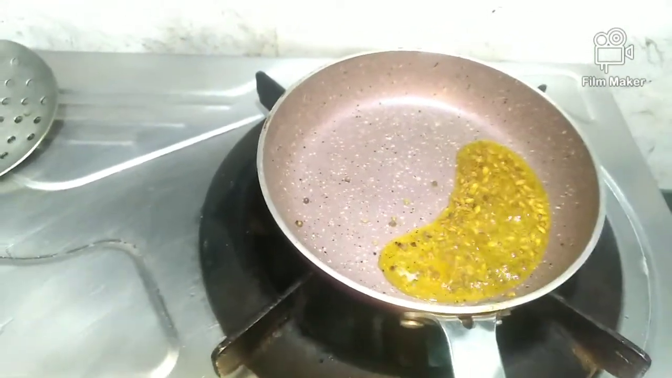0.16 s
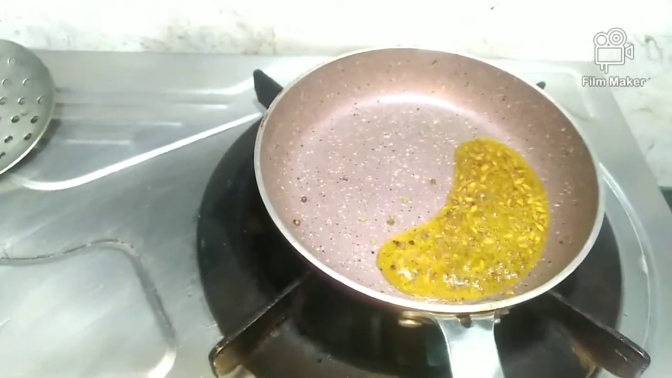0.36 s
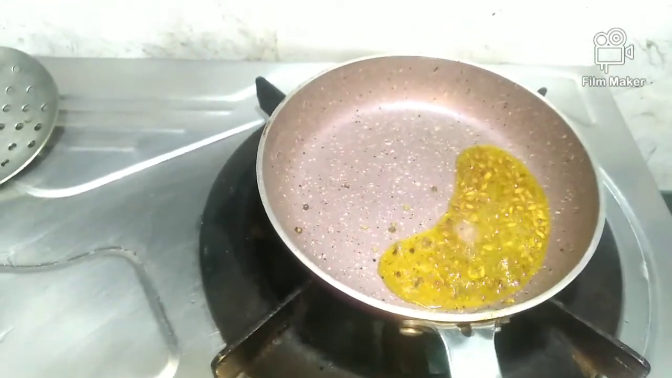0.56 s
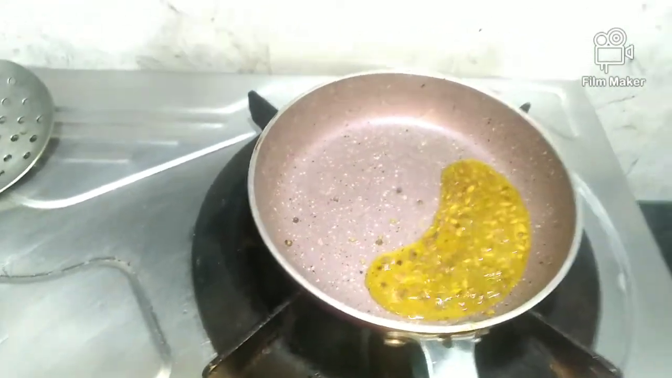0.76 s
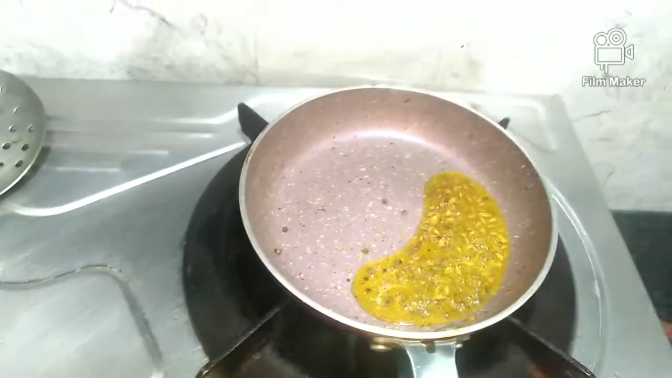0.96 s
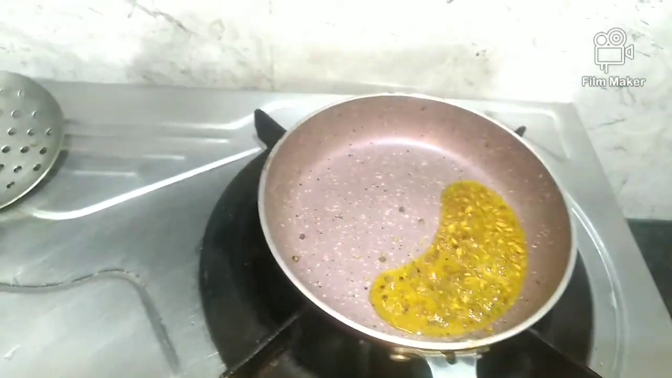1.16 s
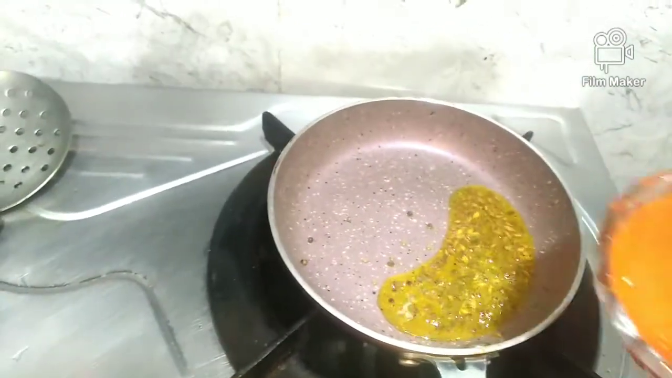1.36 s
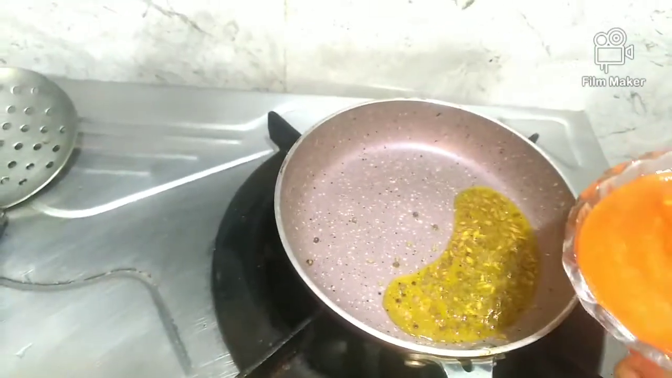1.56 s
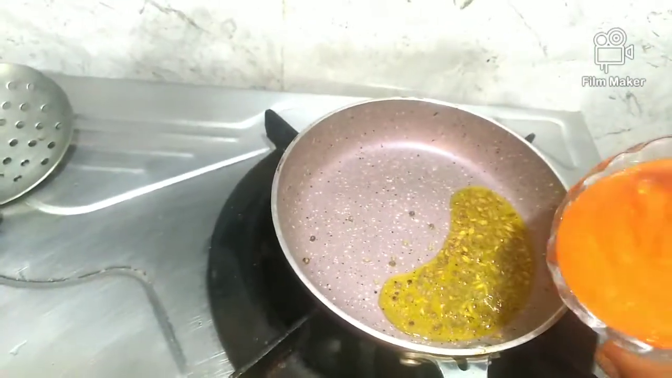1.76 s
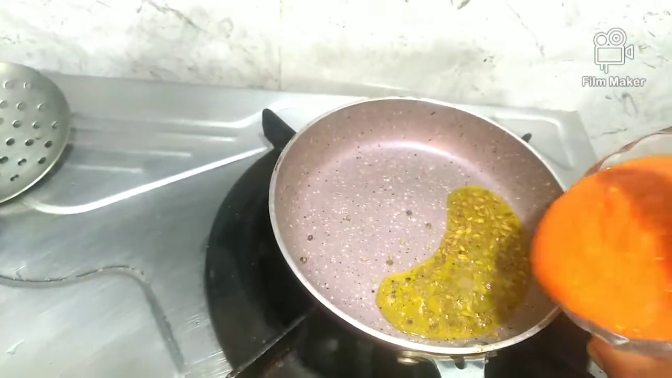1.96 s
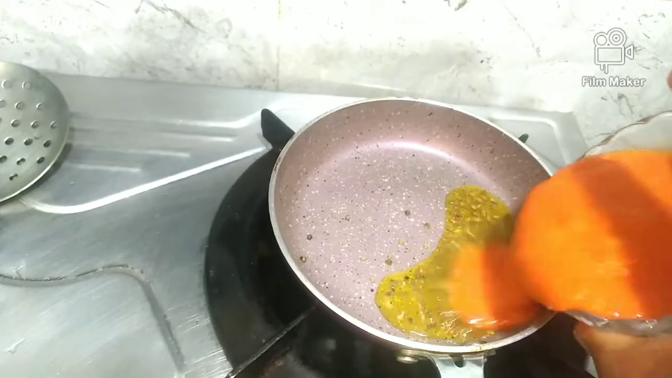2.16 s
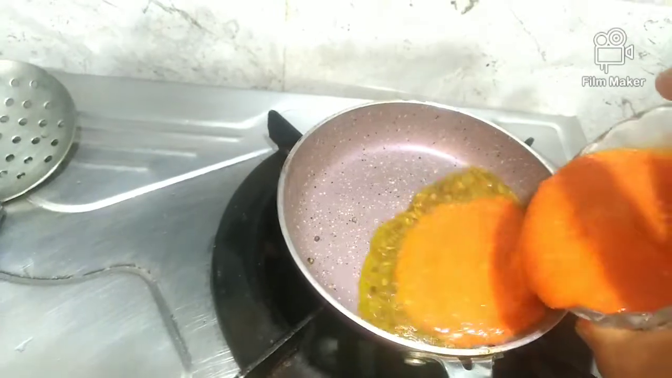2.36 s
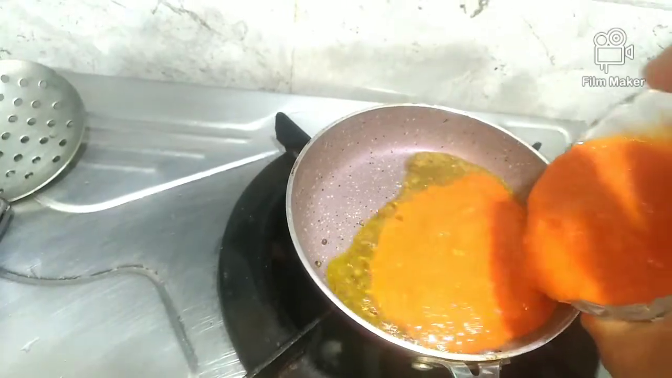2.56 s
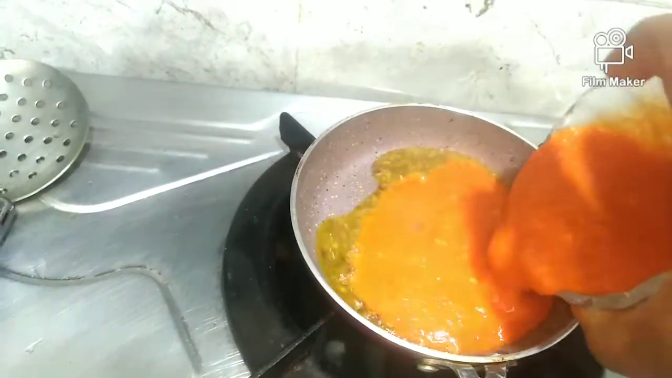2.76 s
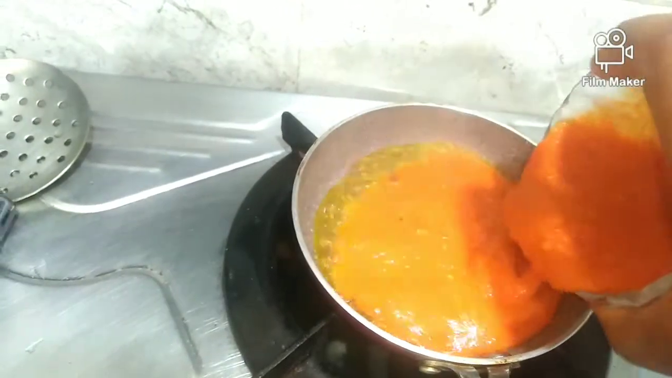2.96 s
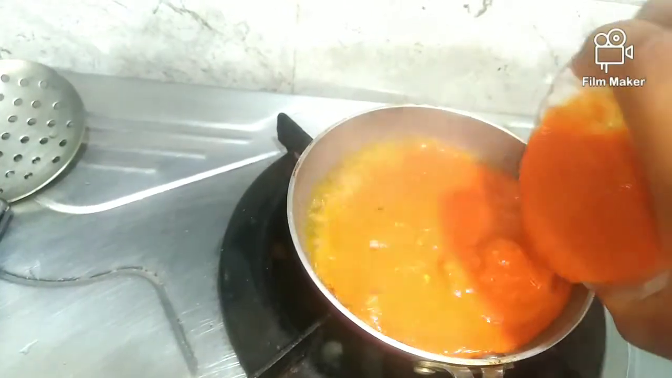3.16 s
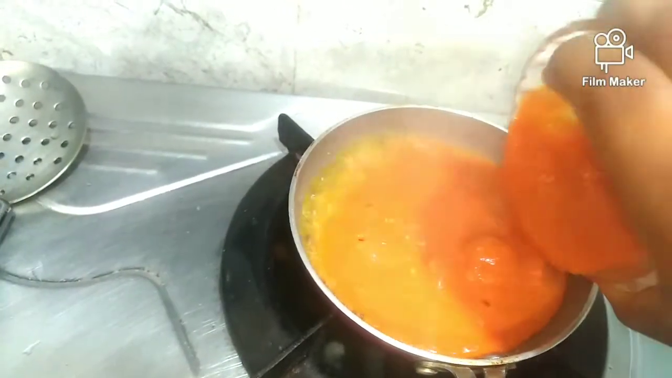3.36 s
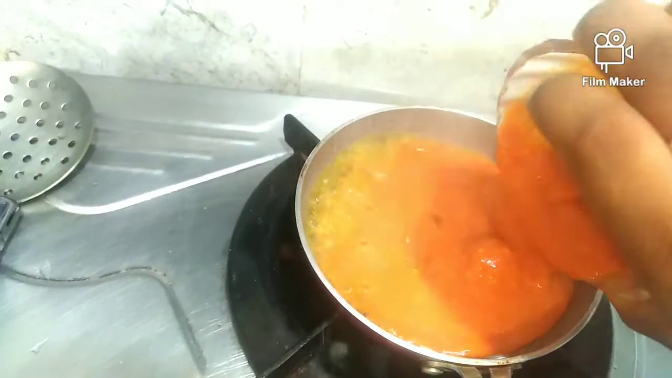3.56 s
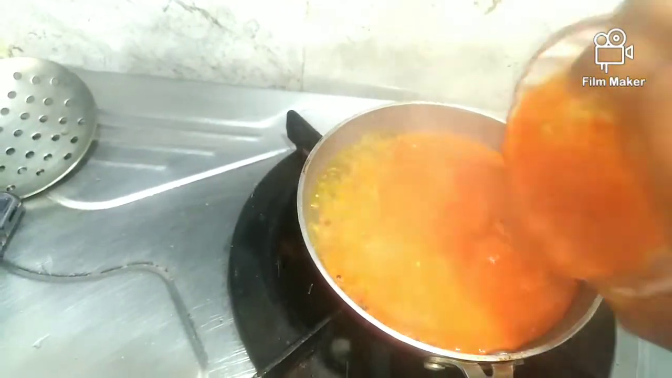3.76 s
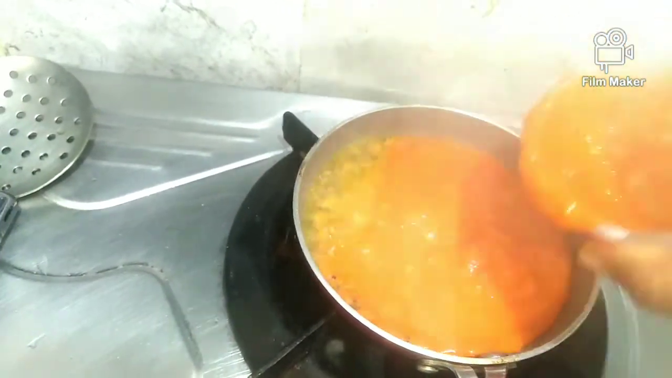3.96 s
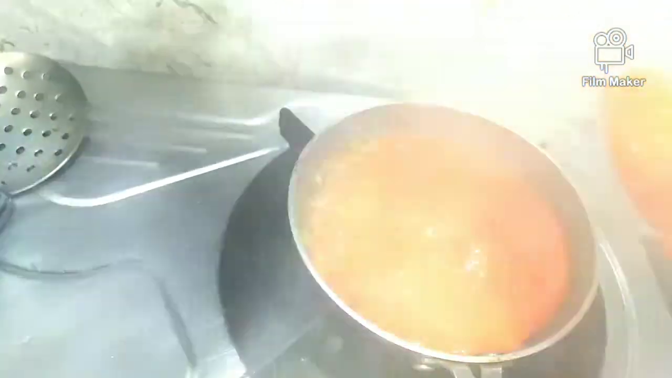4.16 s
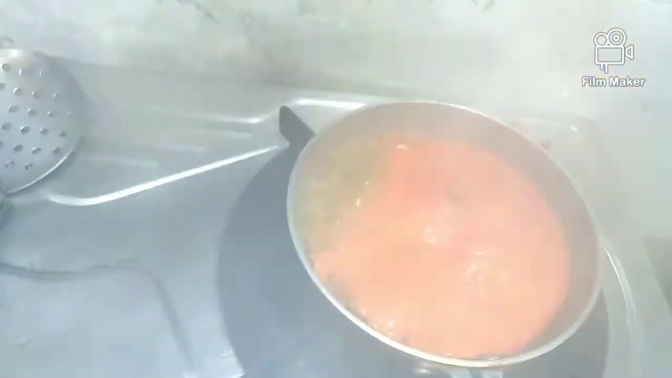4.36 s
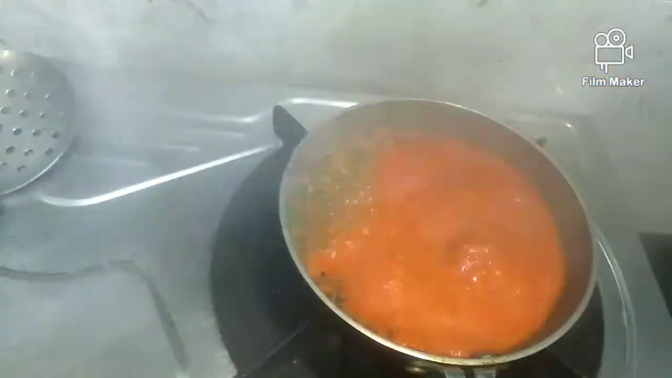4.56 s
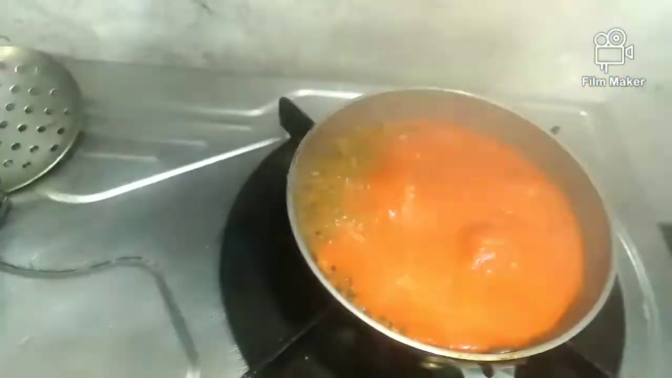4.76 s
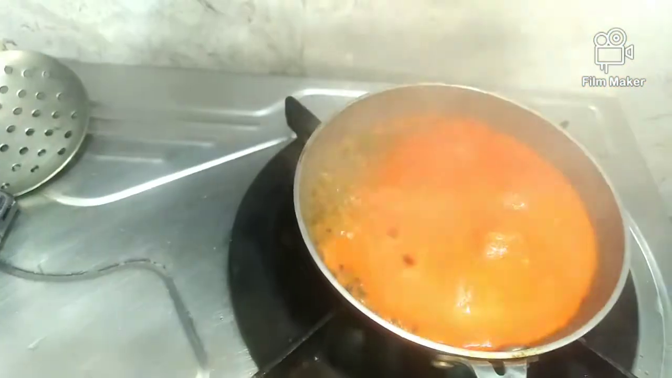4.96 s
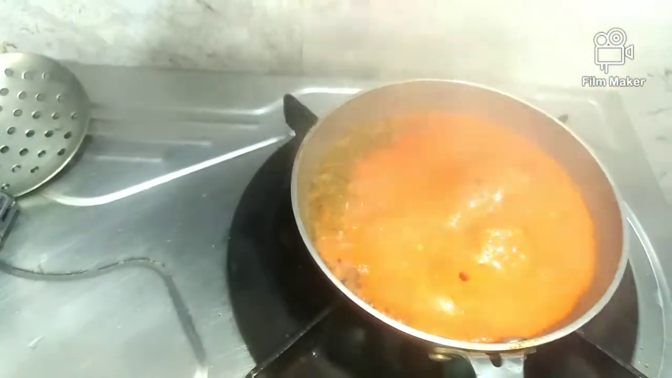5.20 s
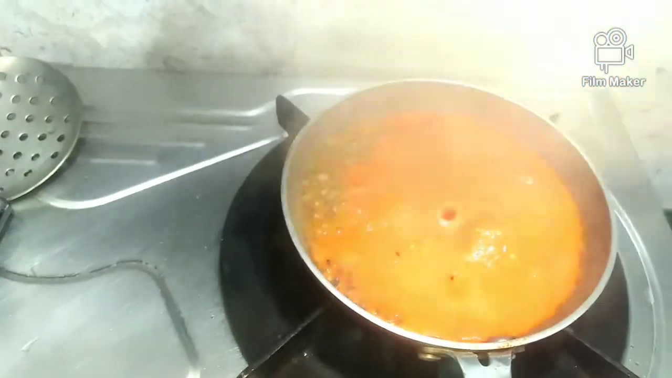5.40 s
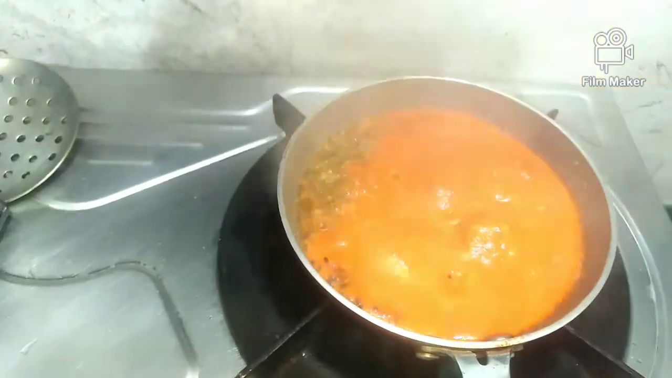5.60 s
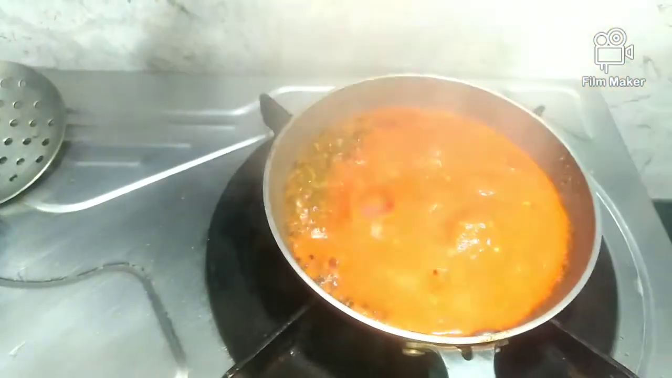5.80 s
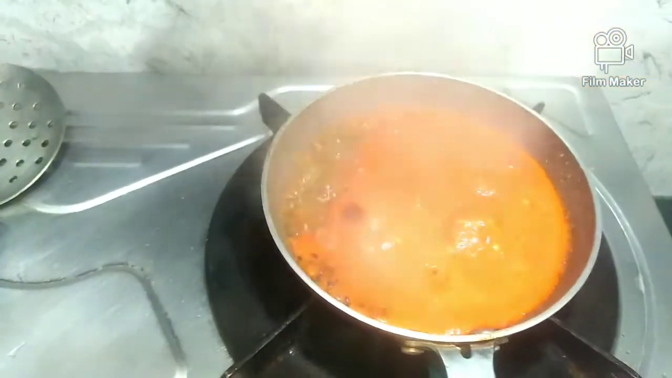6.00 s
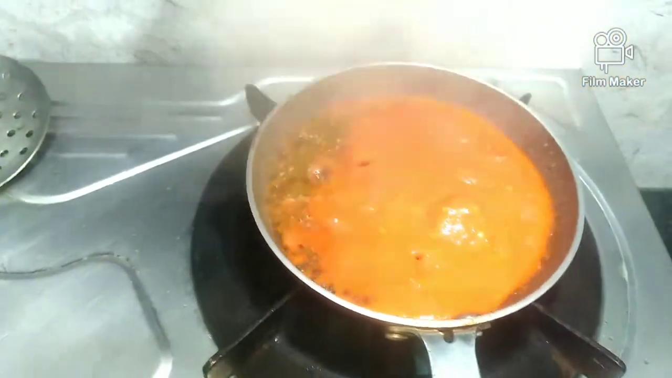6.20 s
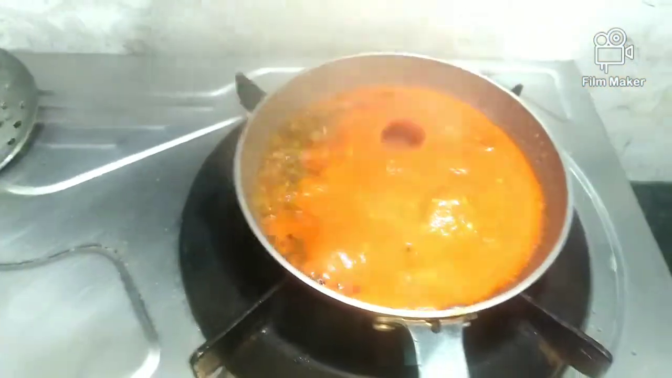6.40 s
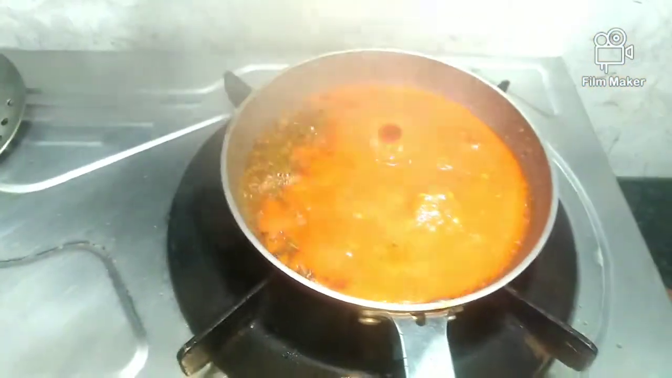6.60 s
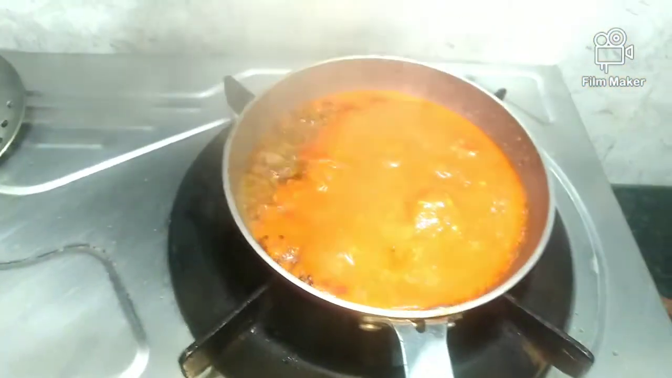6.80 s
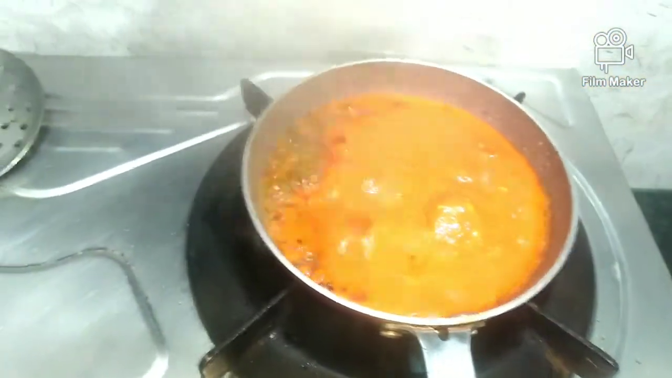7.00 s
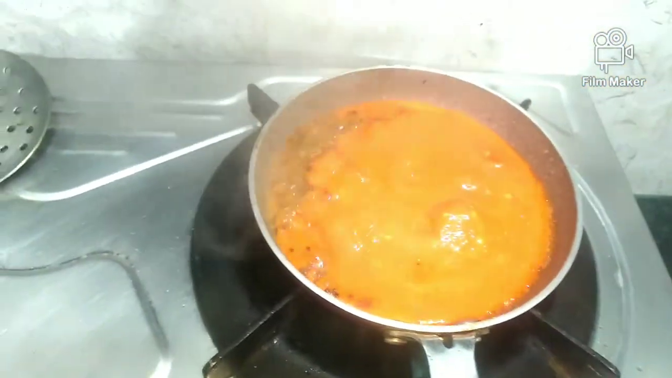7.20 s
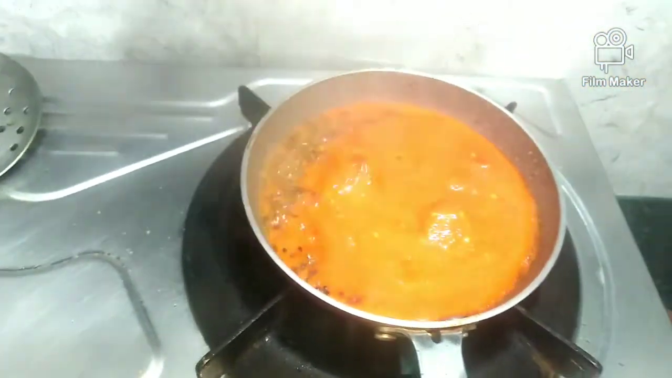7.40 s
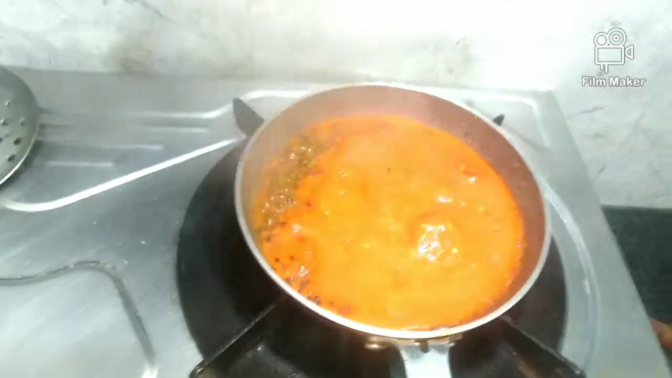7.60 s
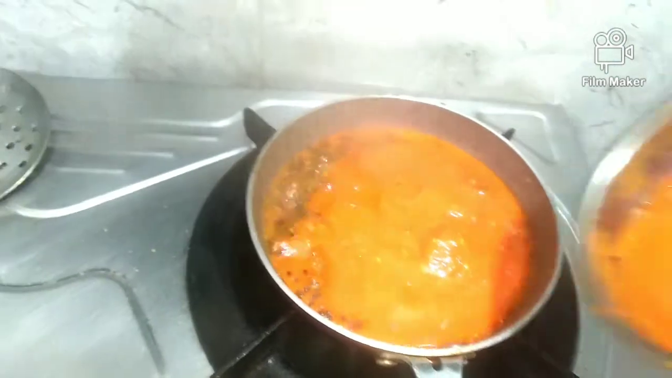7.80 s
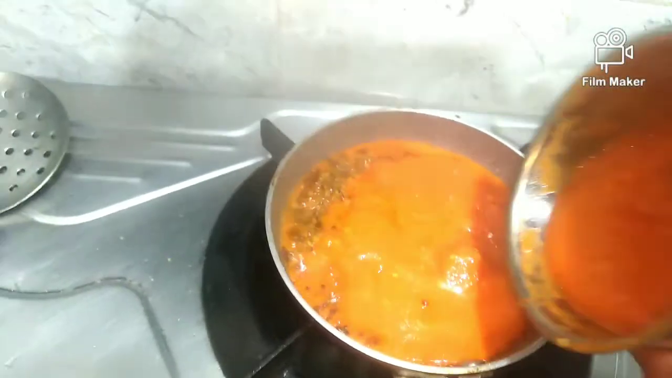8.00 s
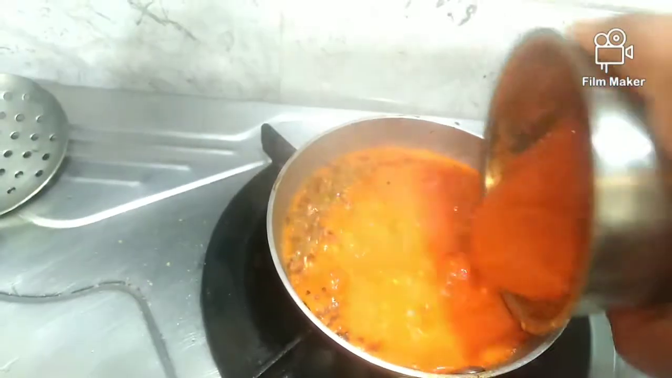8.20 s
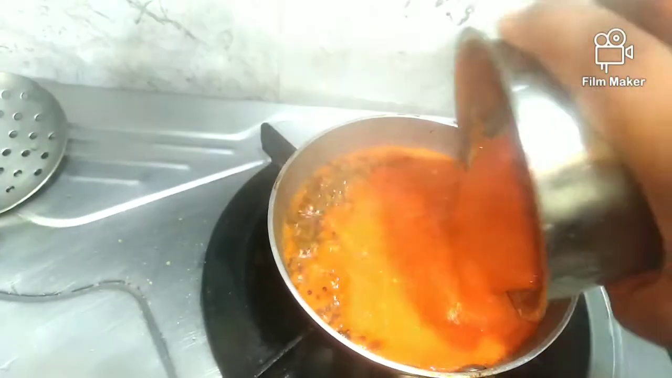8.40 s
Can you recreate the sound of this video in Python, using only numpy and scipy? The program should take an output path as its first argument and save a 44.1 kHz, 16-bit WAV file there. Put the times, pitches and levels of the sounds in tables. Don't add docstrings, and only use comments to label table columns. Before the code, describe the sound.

Close in a small hard kitchen, seeds burst irregularly in hot oil, sharp and bright, over faint fizz and a low gas flame. After two seconds wet paste lands and a sizzle swells fast into a loud, steamy hiss with low plops. It opens up as the bowl lifts, then fades unevenly to a thin simmer. Handheld phone, slightly watery noise reduction.

```python
import sys
import numpy as np
from scipy import signal
from scipy.fft import rfft, irfft
from scipy.io import wavfile
from scipy.ndimage import uniform_filter1d, minimum_filter1d

SR = 44100
rng = np.random.default_rng(int(sys.argv[2]) if len(sys.argv) > 2 else 0)


def file_out(sig):
    cols = np.atleast_2d(sig).T
    lim = np.clip(cols, -1, 1)
    pcm = np.round(lim * 32767).astype(np.int16)
    wavfile.write(sys.argv[1], SR, pcm)


def boost(x):
    u = np.asarray(x, float) / 20
    return 10 ** u


N = 372600
FRAME, HOP = 1024, 256
HZ = np.fft.rfftfreq(FRAME, 1 / SR)[:, None] + 1
FRAME_S = np.arange(N // HOP + 2) * HOP / SR
SPLIT_HZ = 4600
DROWNED_S = 2.3


def rms_one(x):
    return x / np.sqrt(np.mean(x ** 2) + 1e-20)


def per_frame(rows):
    s, *columns = np.transpose(rows)
    return [np.interp(FRAME_S, s, c) for c in columns]


def at_hz(points, hz=HZ):
    point_hz, db = np.transpose(points)
    return np.interp(np.log(hz), np.log(point_hz), db)


def humps_db(modes):
    return sum(db * np.exp(-.5 * ((HZ - hz) / width * 2) ** 2) for hz, width, db in modes)


def bump(t, length):
    return np.exp(-.5 * (t / length * 4) ** 2)


def band_db(shape_db, low, high):
    return 10 * np.log10(np.mean(boost(shape_db) ** 2 * (HZ >= low) * (HZ < high), axis=0))


def levelled(shape_db, edges, levels_db):
    lift = [db - band_db(shape_db, lo, hi) for lo, hi, db in zip(edges, edges[1:], levels_db)]
    centres = np.log(np.sqrt(np.multiply(edges[1:], edges[:-1])))
    share = [np.interp(np.log(HZ), centres, row) for row in np.eye(len(centres))]
    return shape_db + sum(s * db for s, db in zip(share, lift))


def frames(x):
    return signal.stft(x, nperseg=FRAME, noverlap=FRAME - HOP)[2][..., :len(FRAME_S)]


def samples(z):
    return signal.istft(z, nperseg=FRAME, noverlap=FRAME - HOP)[1][..., :N]


def patches(width_hz, length_s):
    size = (len(HZ), len(FRAME_S))
    w = 2 * np.pi * np.fft.fftfreq(size[0], SR / FRAME)[:, None] * width_hz
    v = 2 * np.pi * np.fft.rfftfreq(size[1], FRAME_S[1]) * length_s
    field = np.fft.rfft2(rng.standard_normal(size)) * np.exp(-(w ** 2 + v ** 2) / 8)
    return rms_one(np.fft.irfft2(field, size))


def crackle(per_s, spread_db):
    sizes = boost(spread_db * np.minimum(rng.exponential(1, (2, N)), 5)) * rng.standard_normal((2, N))
    return rms_one(sizes * (rng.random((2, N)) < per_s / SR))


def coloured(count, shape):
    hz = np.fft.rfftfreq(count, 1 / SR) + 1
    return rms_one(irfft(rfft(rng.standard_normal((2, count))) * boost(shape(hz)), count))


def thump(t, hz, cycles):
    return -np.cos(2 * np.pi * hz * t) * np.exp(-.5 * (t * hz / cycles) ** 2)


def ragged(count, spread_db, size):
    return boost(spread_db * rms_one(uniform_filter1d(rng.standard_normal(count), size=size)))


def add(out, s, sound):
    i = round(s * SR)
    out[:, max(i, 0):i + sound.shape[-1]] += sound[..., max(-i, 0):N - i]


# f/Hz, level/dB per Hz
FIZZ_SPECTRUM = [(590, -77), (1000, -12), (1450, -3), (2100, -9), (3000, -10), (4400, -14), (6500, -7),
                 (9000, 1), (15800, 3)]
# f/Hz, level/dB per Hz
FLAME_SPECTRUM = [(15, -73), (25, -7), (50, -5), (72, -8), (92, -17.5), (162, 4), (234, -12), (266, -15),
                  (350, -9.5), (607, -8), (845, -12), (1410, -17.5), (2000, -49), (2600, -64), (4400, -120)]
# f/Hz, width/Hz, level/dB
LOW_RINGS = [(350, 120, 4), (640, 140, 3), (160, 60, 3)]


def oil_and_flame():
    rest_db, stirred_db, settle_s = [-68, -55.5], [-35, -25.5], 0.03
    flame_db = -61
    s, db = np.transpose(POPS)[:2, :, None]
    stirred = np.sum((FRAME_S > s) * boost(db - 60 * np.abs(FRAME_S - s) / settle_s / 3), axis=0)
    levels = [20 * np.log10(boost(rest) + boost(stir) * stirred) for rest, stir in zip(rest_db, stirred_db)]
    fizz = levelled(at_hz(FIZZ_SPECTRUM) + 0 * FRAME_S, [1500, 4500, 15800], levels)
    fizz -= 30 * (HZ < 900)
    fizz -= 100 * np.maximum(FRAME_S - DROWNED_S, 0)
    fizz += 2.0 * patches(1800, 0.013)
    flame = at_hz(FLAME_SPECTRUM)
    flame = flame - band_db(flame, 25, 1600) + flame_db
    flame = flame + 1.18 * humps_db(LOW_RINGS) + 2.5 * patches(144, 0.042)
    return samples(np.hypot(boost(fizz), boost(flame)) * frames(crackle(20000, spread_db=1.6)))


# t/s, peak level/dB, low thump re peak/dB, 1.5-4.5 kHz re peak/dB, clearest ring f/Hz
POPS = [(0.012, -20, -29.5, -11, 2680), (0.076, -18, -42, -21, 6700), (0.152, -11, -40, -24, 12300),
        (0.337, -26, -33, -23, 10600), (0.5136, -20.5, -27.5, -22.5, 9050), (0.5901, -7, -19, -20.5, 13600),
        (0.655, -20.5, -31, -29, 13500), (0.7109, -31, -23, -18, 9150), (1.094, -13, -13.5, -18.5, 13800),
        (1.128, -42, -34, 1, 12700), (1.209, -35.5, -34, -16, 6350), (1.314, -37, -36, 5.5, 2920),
        (1.4505, -9.5, -27, -7, 2460), (1.543, -15, -37, -16, 7950), (1.6308, -41.5, -26, 0, 3820),
        (1.786, -27.5, -57, -7, 3020), (2.004, -8.5, -30, -22.5, 8800), (2.0771, -40.5, -22, 9.5, 3440),
        (2.134, -29.5, -54, -15, 6890), (2.234, -22.5, -49, -21, 8300), (2.3, -26.5, -46, -13, 8300),
        (2.366, -33, -53, -22, 12000), (2.4528, -25.5, -40, -5, 3600), (2.5322, -17.5, -40, -22, 6960),
        (2.609, -18.5, -43, -26, 8030), (2.663, -18, -43, -22, 9000)]
# f/Hz, level/dB per Hz
POP_SPECTRUM = [(290, -54), (500, -40), (677, -18), (917, -26), (1810, -13.5), (2520, 0), (3040, -0.5),
                (5920, 0.5), (7780, -1.5), (8600, 5), (10000, -1), (11900, 3), (13100, 2.5), (15800, 4.5)]


def pops():
    pan_ring_hz, spit_ring_hz = 2670, 8300
    above_ring_db_per_octave, debris_db, lead_s = -9, 3.5, .04
    out, t = np.zeros((2, N)), np.arange(16384) / SR - lead_s
    tail = (t > 0) * (boost(-32.5 - 60 * t / 0.8) + boost(-25.5 - 60 * t / 0.67))
    burst = np.where(t < 0, np.exp(-np.abs(t / 0.0077) ** 3.1), bump(t, 0.031))
    swell = np.hypot(burst, tail)
    spatter = np.hypot(burst, (t > 0) * boost(-15.0 - 60 * t / 0.37))
    push = thump(t - .0035, 230, cycles=0.46)
    push += 0.32 * thump(t - .0015, 360, cycles=1.0)
    push += 0.13 * thump(t + 0.00072, 660, cycles=1.0)

    def treble_db(f, ring_hz):
        ring = 8 * bump(np.log(f / ring_hz), 2.3) + above_ring_db_per_octave * np.log2(f / ring_hz).clip(0)
        return at_hz(POP_SPECTRUM, f) + ring - 5 * (f < 6000) - 60 * (f < SPLIT_HZ)

    def mid_spectrum_db(f, ring_hz):
        rings = 8 * bump(np.log(f / ring_hz), 0.23) + 5 * bump(np.log(f / 1300), 0.88)
        return at_hz(POP_SPECTRUM, f) + rings - 60 * (f > SPLIT_HZ)

    for s, db, low_db, mid_db, ring_hz in POPS:
        mid_hz, high_hz = (ring_hz, spit_ring_hz) if ring_hz < SPLIT_HZ else (pan_ring_hz, ring_hz)
        treble = coloured(len(t), lambda f: treble_db(f, high_hz))
        mid = coloured(len(t), lambda f: mid_spectrum_db(f, mid_hz))
        knock = coloured(len(t), lambda f: -5 * np.log2(f / 900) ** 2)
        debris = ragged(len(t), debris_db, size=90) ** np.clip(t / .02 - 1, 0, 1)
        hiss = debris * (swell * treble + boost(mid_db + 2.5) * np.hypot(spatter, tail) * mid)
        low = push + boost(-15.5) * swell * knock
        add(out, s + .005 - lead_s, boost(db) * (boost(-8.5) * hiss + boost(low_db + 5.5) * low))
    return out


# t/s, level/dB, centre f/Hz, length/s
SPLUTTERS = [(5.335, -36, 1900, 0.12), (5.325, -34, 2000, 0.089), (2.2, -45, 2300, 0.035),
             (5.33, -45, 410, 0.11), (7.5, -53, 3900, 0.051), (5.08, -48.5, 510, 0.22),
             (5.1, -42, 2200, 0.067), (5.69, -46, 1070, 0.075), (2.34, -44, 1370, 0.18),
             (1.135, -44.5, 6500, 0.1), (0.635, -35.5, 12000, 0.14), (1.81, -45.5, 7400, 0.071),
             (1.6, -38, 5500, 0.035), (1.225, -47, 6300, 0.07), (1.32, -50, 12000, 0.03)]


def splutters():
    lead_s, ragged_db = .09, 1.8
    out, t = np.zeros((2, N)), np.arange(8192) / SR - lead_s
    for s, db, hz, length in SPLUTTERS:
        noise = coloured(len(t), lambda f: -4 * np.log2(f / hz) ** 2 - 9 * np.log2(f / hz).clip(0) ** 2)
        add(out, s - lead_s, boost(db) * ragged(len(t), ragged_db, size=200) * bump(t, length) * noise)
    return out


# t/s, level/dB
VIGOUR = [(2.15, -44), (2.67, -28.5), (2.92, -24), (3.5, -23.5), (3.6, -24.5), (3.62, -21), (4.78, -24),
          (4.99, -27), (6.83, -31.5), (6.98, -35.5), (7.04, -29), (7.24, -36.5), (7.36, -34), (7.6, -38.5),
          (7.69, -34.5), (7.9, -37.5), (8.43, -38.5), (8.45, -37)]
SIZZLE_BANDS_HZ = [200, 1200, 4500, 10500, 15800]
# covered level/dB at full vigour, share of swing, open-pan level/dB, open-pan share
SIZZLE_LAW = [
    (-51.5, 0.16, -53, 0.53),
    (-36, 0.042, -35, 0.87),
    (-19.5, 1.22, -21.5, 1),
    (-26, 1.14, -25.5, 0.98),
]
# f/Hz, level/dB per Hz
POURING = [(53, -54), (90, -20), (233, 1), (950, -8.5), (1940, -21.5), (2260, -17.5), (2410, -13),
           (3400, -15), (3710, -13), (4220, -14.5), (4510, -14.5), (6400, -8), (8600, -2), (10500, -3),
           (15800, 3)]
# f/Hz, level/dB per Hz
OPEN_PAN = [(53, -64), (90, -34), (161, -17.5), (497, -20.5), (578, -20), (817, -17), (1110, -21),
            (1400, -16), (2070, -16), (2360, -16.5), (5130, -16), (8440, -1.5), (10500, -7), (14800, -2),
            (15800, -5)]
# f/Hz, level/dB per Hz
SIMMER = [(53, -68), (90, -51), (165, -20), (205, -37.5), (351, -19.5), (566, -29.5), (702, -23),
          (1110, -22.5), (1430, -17), (2070, -14.5), (2360, -13.5), (3400, -13.5), (3710, -17.5),
          (8620, -3.5), (10200, -5.5), (12000, -7.5), (15800, -7)]
# f/Hz, width/Hz, level/dB
BOWL_SLOTS = [(520, 97, -11), (932, 120, -16), (1044, 43, 8), (1360, 81, -23), (1466, 71, 7),
              (1946, 210, 8), (2180, 79, -32), (2322, 98, -37), (2447, 72, 10.5), (2640, 171, -23),
              (2950, 140, 4), (3073, 45, -11), (3150, 110, 3), (3390, 70, -14), (3470, 82, -14),
              (3500, 80, -5), (3560, 83, 2), (3790, 70, 5.5), (3906, 90, -21), (4140, 100, -42),
              (4260, 140, -9), (6290, 93, 6.5), (6467, 220, -12), (6780, 140, 6), (7030, 190, -10),
              (7290, 160, 5), (7720, 220, -10), (8300, 110, 5), (8400, 90, -7), (8630, 120, 4.5),
              (8920, 250, -5.5), (9150, 110, 8), (9440, 150, -11), (9900, 89, 0), (15000, 330, -10)]
# f/Hz, width/Hz, level/dB
PAN_RINGS = [(1475, 41, 7), (1550, 74, -10), (1700, 62, 3), (1754, 70, -8.5), (2020, 43, -2.5),
             (2110, 50, -4), (2310, 71, 6), (2476, 54, 8.5), (2540, 55, -10), (2620, 70, 9.5),
             (2680, 60, -13), (2730, 54, 6), (2930, 65, 4), (3160, 99, 0), (5850, 120, -2.5),
             (7030, 200, 2.5), (7110, 90, -10), (7300, 120, 4), (8700, 670, 3.5), (9100, 210, -6),
             (9420, 230, 6)]
# f/Hz, width/Hz, level/dB
THIN_PASTE_RINGS = [(3316, 60, 2), (3460, 74, -16), (3840, 65, -13), (3730, 63, 10), (3920, 69, 5),
                    (4240, 97, -16), (4420, 80, 5.5), (4500, 70, -7)]
# f/Hz, width/Hz, level/dB
SIMMER_SLOTS = [(3716, 85, -17), (3150, 74, -10), (2120, 42, -12), (4520, 130, -3.5), (5700, 150, -8)]
# t/s, f/Hz, level/dB
DULL_BAND = [(5.1, 10600, -1), (5.5, 11300, -2), (6.1, 12100, -6), (6.8, 13500, -13), (7.5, 13300, -3),
             (7.9, 12200, -4), (8.45, 11600, -15)]
# t/s, f/Hz, length/s, width/Hz, level/dB
GAPS = [(2.93, 4100, 0.15, 260, -22), (3.18, 3400, .2, 110, -20), (2.95, 2640, .2, 90, -14),
        (2.17, 10600, .05, 250, -20), (2.2, 12800, .05, 249, -20), (2.42, 13100, .06, 250, -22),
        (2.733, 5100, .05, 200, -22), (3.3, 14500, .04, 300, -20), (3.47, 5030, 0.042, 300, -24),
        (3.47, 13000, .04, 300, -20), (3.5, 14700, 0.14, 250, -24), (3.82, 5070, .09, 260, -25),
        (4.04, 4380, .03, 200, -22), (4.167, 4440, 0.049, 170, -20), (4.47, 4530, .05, 160, -18),
        (4.817, 5130, 0.043, 400, -22), (4.925, 4980, 0.092, 150, -13), (5.06, 4350, 0.031, 250, -12),
        (5.38, 3770, .17, 110, -18), (5.393, 5250, 0.042, 300, -20), (5.099, 2060, 0.64, 55, -11),
        (6.55, 3750, .13, 150, -20), (7.28, 3760, .08, 150, -20), (7.47, 5660, .06, 180, -16),
        (7.95, 4500, .09, 200, -22), (8.22, 3780, .07, 150, -18), (8.41, 11200, 0.033, 397, -22)]


def sizzle_shape():
    bowl_lifts_s, bowl_arrives_s, bowl_tips_s = 3.62, 2.08, 0.43
    covered = FRAME_S < bowl_lifts_s
    waver = np.clip(1 + 0.5 * patches(120, 0.05), 0, 2)
    tipped = np.clip((FRAME_S - bowl_arrives_s) / bowl_tips_s, 0, 1)
    under_bowl = at_hz(POURING) + humps_db(BOWL_SLOTS) * waver * tipped

    thick = np.clip((FRAME_S - 4.6) / 1.74, 0, 1)
    thin_db = at_hz(OPEN_PAN) + humps_db(THIN_PASTE_RINGS)
    open_pan = (1 - thick) * thin_db + thick * at_hz(SIMMER) + humps_db(PAN_RINGS)
    open_pan += np.clip((FRAME_S - 4.7) / 1.8, 0, 1) * humps_db(SIMMER_SLOTS) * waver
    dull_hz, dull_db = per_frame(DULL_BAND)
    patchy = np.clip(1 + 0.97 * patches(170, 0.04), 0, 4)
    open_pan += humps_db([(dull_hz, 2300, dull_db)]) * patchy

    gaps = sum(humps_db([(hz, width, db)]) * bump(FRAME_S - s, 2 * length)
               for s, hz, length, width, db in GAPS)
    return covered, np.where(covered, under_bowl, open_pan) + gaps + humps_db(LOW_RINGS)


def sizzle():
    full_db, paste_lands_s, spreads_db_per_s = -23, 2.38, 53
    covered, shape = sizzle_shape()
    flutter = np.where(covered, 1.6, 0.94) * patches(6300, 0.012)
    flutter = flutter + 1.0 * patches(1380, 0.016) + 1.7 * patches(370, 0.037) / (1 + HZ / 1500)
    swing = per_frame(VIGOUR)[0] - full_db
    levels = [np.where(covered, db + share * swing, open_db + open_share * swing)
              for db, share, open_db, open_share in SIZZLE_LAW]
    levels[-1] += 5.5 * bump(FRAME_S - 2.68, 0.5)
    levels[-1] += 6 * bump(FRAME_S - 8.3, 0.47)
    wet = -spreads_db_per_s * np.maximum(paste_lands_s - FRAME_S, 0) * (HZ < SPLIT_HZ)
    start = np.clip((FRAME_S - VIGOUR[0][0]) / 0.03 + 1, 0, 1)
    gain = boost(levelled(shape, SIZZLE_BANDS_HZ, levels) + wet + flutter) * start
    return samples(gain * frames(crackle(18000, spread_db=-0.4)))


# t/s, peak level/dB, f/Hz
PLOPS = [(2.707, -36, 374), (2.767, -29.5, 280), (2.956, -36, 252), (3.02, -33, 231), (3.075, -36.5, 355),
         (3.476, -38, 324), (3.72, -52, 342), (3.761, -44, 256), (4.308, -41, 350), (4.527, -39, 293),
         (5.207, -43, 397), (5.307, -42, 350), (5.488, -44, 474), (5.676, -40, 342)]


def plops():
    lead_s = .09
    out, t = np.zeros((2, N)), np.arange(8192) / SR - lead_s
    for s, db, hz in PLOPS:
        plop = thump(t, hz, cycles=0.39) + 0.24 * thump(t, 2.3 * hz, cycles=0.25)
        add(out, s + 0.0073 - lead_s, boost(db + 1.5) * plop)
    return out


def scene():
    return oil_and_flame() + pops() + splutters() + sizzle() + plops()


def lean(z, band, lean_db, excess_db):
    memory_s, hold_db_per_s, quiet_db = 2.67, 184, -75
    level = 10 * np.log10(uniform_filter1d(np.sum(np.abs(z) ** 2 * band, axis=0), size=7) + 1e-12)
    span = int(memory_s / FRAME_S[1])
    padded = np.r_[np.full(span, quiet_db), level]
    quiet = minimum_filter1d(padded, span, origin=(span - 1) // 2)[span:]
    quiet = np.where(FRAME_S < memory_s, np.maximum(quiet, level[:span].min()), quiet)
    held = np.maximum.accumulate(level + hold_db_per_s * FRAME_S) - hold_db_per_s * FRAME_S
    return lean_db * np.exp(-(held - uniform_filter1d(quiet, size=41)).clip(0) / excess_db)


def steer(a, b):
    high = HZ > SPLIT_HZ
    low_db = lean(a, (HZ > 600) & (HZ < SPLIT_HZ), lean_db=-18, excess_db=7.5)
    high_db = lean(a, high, lean_db=-8.5, excess_db=11)
    chance = patches(370, 0.054) * np.clip(-low_db / 3, 0, 1)
    loose = 1 / (1.5 + np.exp(-4 * (chance - 2.5 - 0.5 * low_db * (1500 / HZ) ** 0.59)))
    loose *= loose > .1
    left_db = np.where(high, high_db, -8 * loose * np.clip(HZ / 250, 0, 1))
    left_gain = boost(left_db - 1.5 * (FRAME_S < DROWNED_S) * high)
    alike = np.where(high, np.clip(0.43 + 0.017 * high_db, 0, 1), 1 - 0.34 * loose)
    left = left_gain * (alike * a + np.sqrt(1 - alike ** 2) * b)
    keep = 2 / np.sqrt(1 + left_gain ** 2 + 2 * left_gain * alike)
    return np.array([left, a]) * keep


# f/Hz, level/dB
SLOT_DEPTH = [(100, 10), (1500, 8), (2800, 5), (3600, 17), (5800, 20), (7000, 8), (9500, 5), (12500, 16),
              (15800, 5)]
# f/Hz, level/dB
RIPPLE = [(100, 0.5), (600, 3), (1500, 3), (2600, 2.5), (4000, 2.5), (7000, 1.8), (15800, 1.8)]


def noise_slots(a):
    spared_above_db, spared_over_db = 0, 7
    power = uniform_filter1d(np.abs(a) ** 2, size=25, axis=0) + 1e-20
    sudden_db = 10 * np.log10(power / uniform_filter1d(power, size=60, axis=1))
    slots_db = -np.abs(at_hz(SLOT_DEPTH)) * np.maximum(patches(95, 0.032) - .3, 0) ** 2.9
    slots_db += at_hz(RIPPLE) * 2 * np.tanh(patches(18.0, 0.37) / 2)
    slots_db = np.maximum(slots_db, -9.0 - 30 * (HZ > 1800))
    slots_db -= 10 * np.log10(uniform_filter1d(boost(slots_db) ** 2, size=50, axis=0))
    return boost(slots_db * np.clip(2.5 - (sudden_db - spared_above_db) / spared_over_db, 0, 1))


# f/Hz, level/dB
GATE = [(1000, -22), (2000, -13), (3000, -9.5), (3600, -8), (5800, -8), (6800, -14), (9500, -19),
        (11000, -13), (13500, -12), (15800, -15)]


def gate(z):
    shut_db = -42
    power = uniform_filter1d(uniform_filter1d(np.abs(z) ** 2, size=3, axis=0), size=4, axis=1) + 1e-20
    under_db = 10 * np.log10(power / uniform_filter1d(power, size=41, axis=0).clip(1e-20))
    return boost(shut_db * (under_db < at_hz(GATE)))


def low_pass(x):
    return signal.sosfilt(signal.butter(12, 16700, fs=SR, output="sos"), x)


def record(dry):
    cutoff_hz, rumble_cut_hz = 15725, 63
    a, b = frames(dry)
    both = steer(a, b) * noise_slots(a)
    both = both * gate(both.sum(axis=0))
    band = (HZ < cutoff_hz) / np.hypot(1, (rumble_cut_hz / HZ) ** 3)
    return low_pass(samples(both * band))


dry = scene()
out = record(dry)
file_out(out)
```